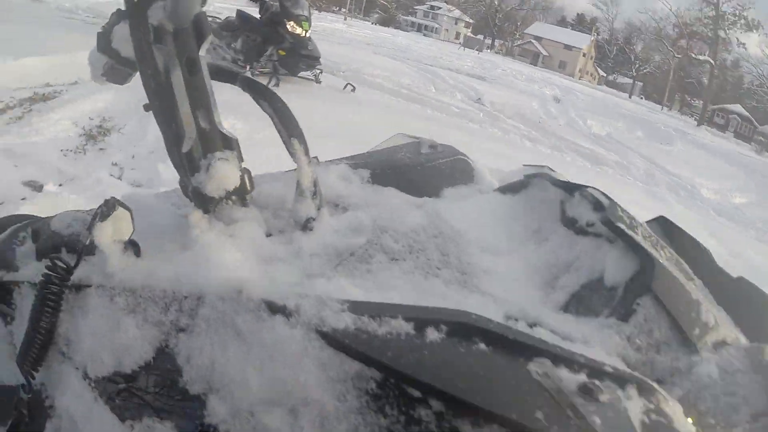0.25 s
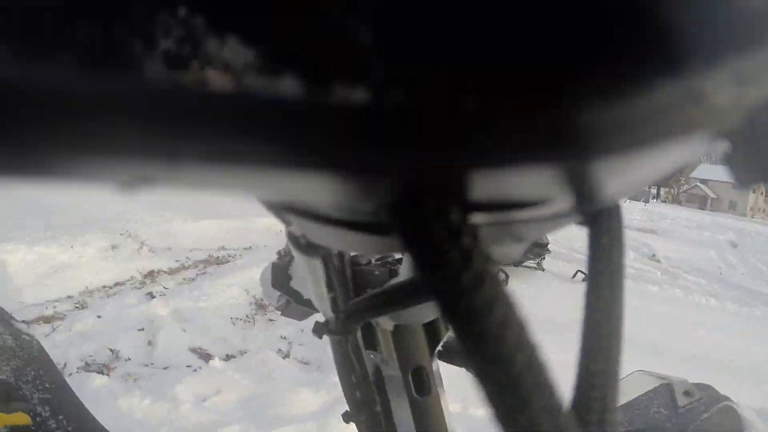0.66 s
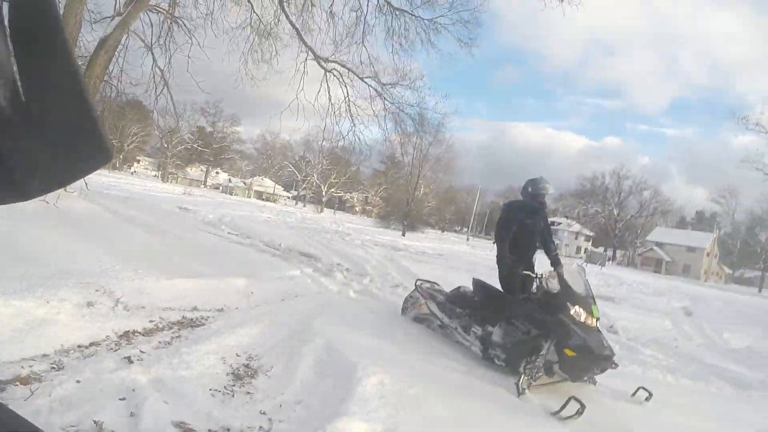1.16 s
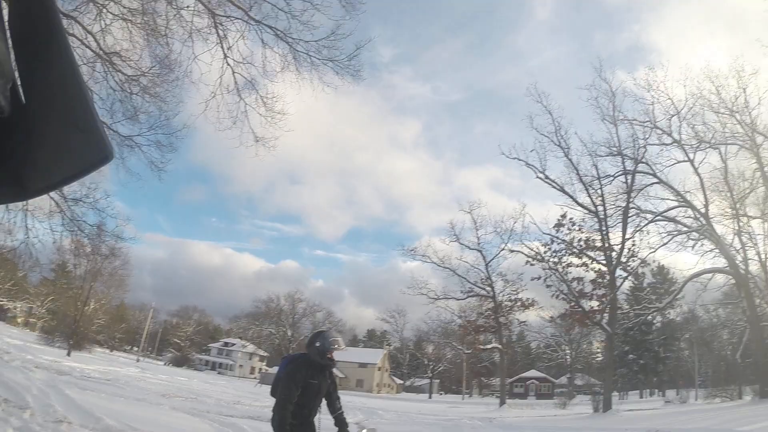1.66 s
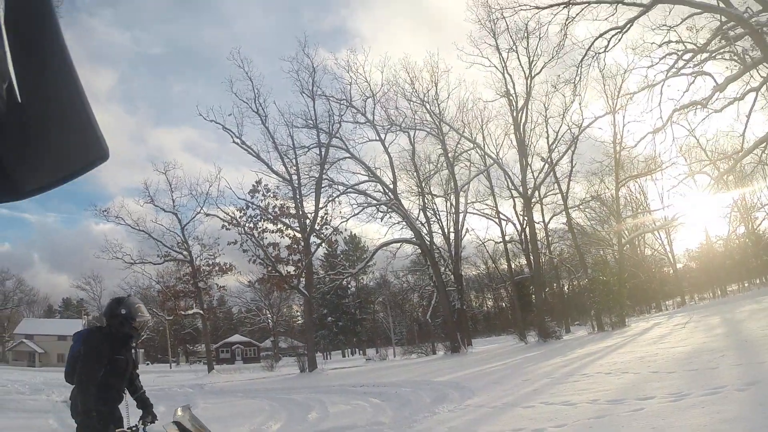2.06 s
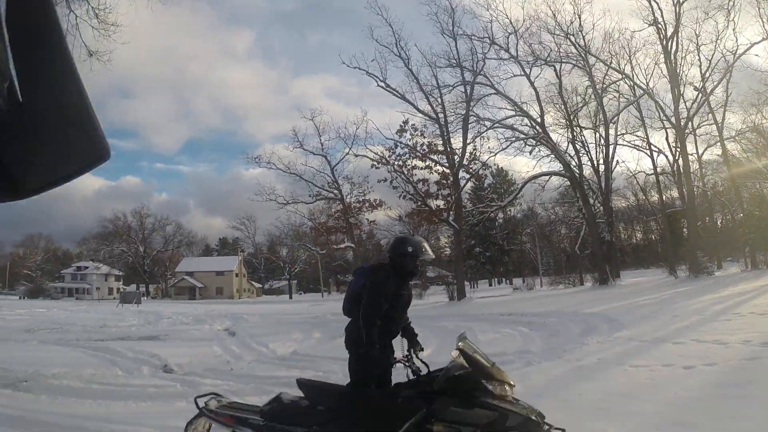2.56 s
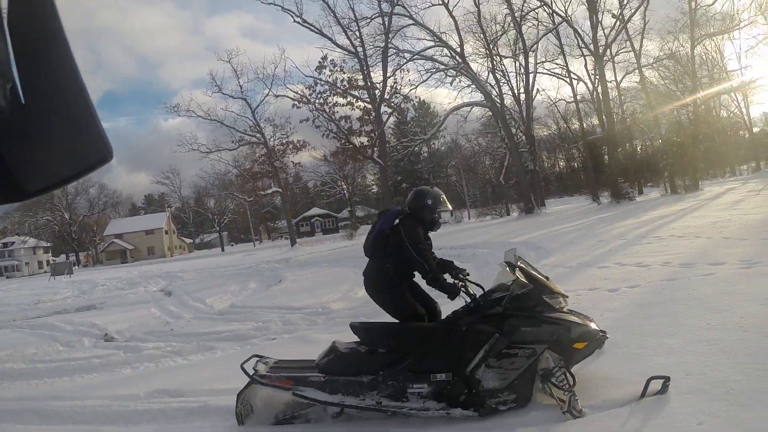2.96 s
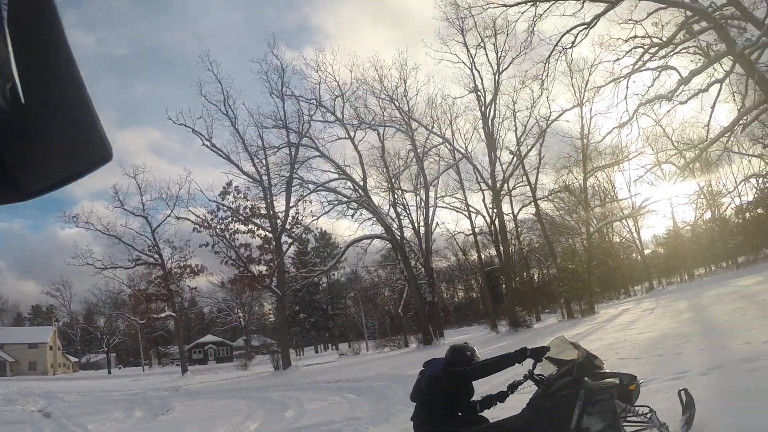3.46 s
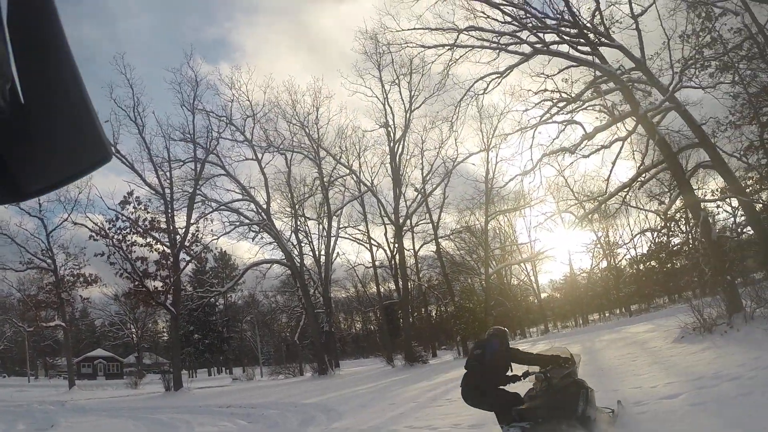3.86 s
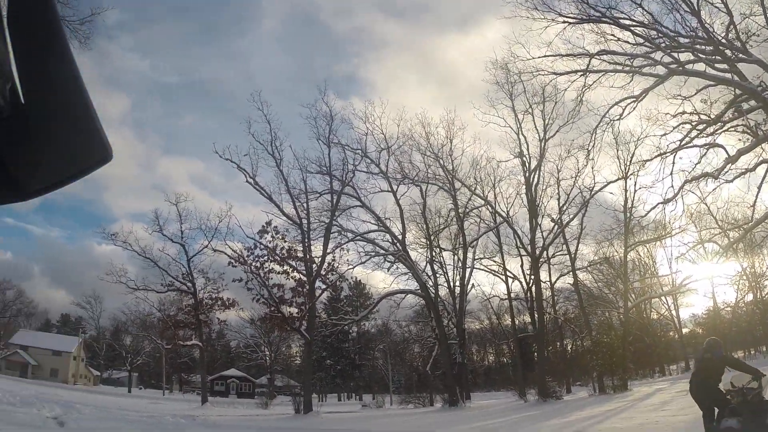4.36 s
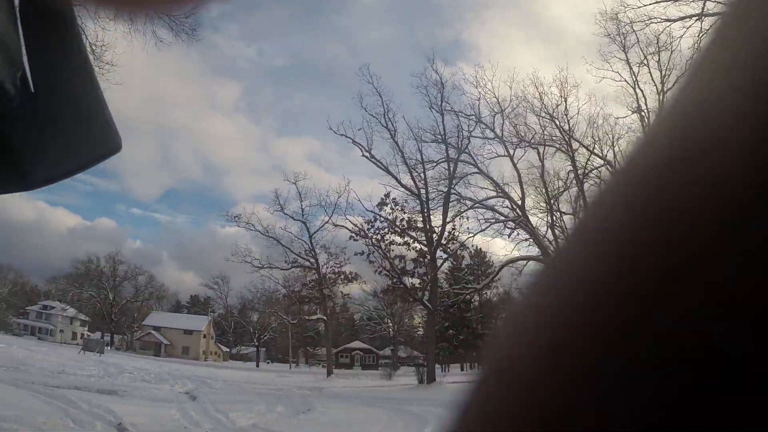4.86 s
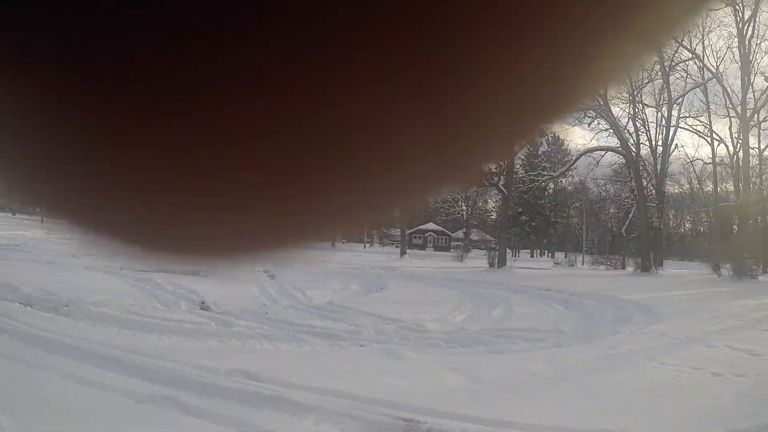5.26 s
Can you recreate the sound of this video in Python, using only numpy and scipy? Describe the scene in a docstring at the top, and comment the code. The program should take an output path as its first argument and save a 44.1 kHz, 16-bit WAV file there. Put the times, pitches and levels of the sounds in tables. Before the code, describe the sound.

A snowmobile idles while a camera mount rattles and clacks, then a second snowmobile revs past and a finger rubs the housing.

```python
"""In a snowy field, a two-stroke snowmobile idles, heard from a camera on its handlebar.
Its uneven firings make a low hum and a pulsing clatter. A gloved hand swivels the camera: the mount
rattles, clacks and scrapes. A second sled revs and drives past, its exhaust barking, its belt and chain
singing and its track slapping the snow. Then a finger lands on the housing and rubs over it."""
import sys
import numpy as np
from scipy import signal
from scipy.fft import rfft, irfft, next_fast_len
from scipy.io import wavfile
from scipy.ndimage import map_coordinates

SR = 44100
rng = np.random.default_rng(int(sys.argv[2]) if len(sys.argv) > 2 else 0)


def generate_wav(signal):
    """Clip the signal to [-1, 1] and save it as 16-bit WAV at the path in sys.argv[1]."""
    frames = np.transpose(np.atleast_2d(signal))
    scaled = np.clip(frames, -1, 1) * 32767
    pcm = np.round(scaled).astype(np.int16)
    wavfile.write(sys.argv[1], SR, pcm)


N = 242991


def amp(db):
    """Turn decibels into a gain."""
    return 10 ** (np.asarray(db) / 20)


def unit(x):
    """Scale a signal to an average (rms) level of 1."""
    return x / np.sqrt(np.mean(x ** 2) + 1e-20)


def gain(points, hz):
    """Gain at hz on a curve through (frequency [Hz], level [dB]) points."""
    f, db = np.transpose(points)
    return amp(np.interp(np.log(hz + 1), np.log(f + 1), db))


def lift(peaks, hz):
    """Gain at hz of a body that rings at (frequency [Hz], width [Hz], boost [dB]) peaks."""
    return amp(sum(db / (1 + (2 * (hz - centre) / width) ** 2) for centre, width, db in peaks))


def curves(rows):
    """One value per sample for each column after the time."""
    s, *cols = np.transpose(rows)
    return [np.interp(np.arange(N) / SR, s, c) for c in cols]


def swells(rows):
    """A gain that rises 20 dB to each peak in its rise time and drops 20 dB in its fall time."""
    t = np.arange(N) / SR
    return np.sqrt(sum(amp(db - 20 * np.maximum((s - t) / rise, (t - s) / fall)) ** 2
                       for s, db, rise, fall in rows))


def wobble(rate):
    """A smooth curve through `rate` random points a second."""
    return map_coordinates(rng.standard_normal(int(N * rate / SR) + 4), [np.arange(N) * rate / SR])


def wavering_phase(hz, jitter, rate):
    """The phase of a tone whose pitch strays at random by about the fraction `jitter`."""
    return 2 * np.pi * np.cumsum(hz * (1 + jitter * wobble(rate))) / SR


def filtered(x, response):
    """Scale each frequency in x by response(hz)."""
    m = next_fast_len(N + SR // 2)
    return irfft(rfft(x, m) * response(np.fft.rfftfreq(m, 1 / SR)), m)[:N]


def noise(colour):
    """Noise at level 1, shaped by (frequency [Hz], level [dB]) points."""
    return unit(filtered(rng.standard_normal(N), lambda hz: gain(colour, hz)))


def tap_response(response, size=4096):
    """How a body with this frequency response rings after one sharp tap."""
    cepstrum = irfft(np.log(response(np.fft.rfftfreq(size, 1 / SR)) + 1e-6))
    cepstrum[1:size // 2] *= 2  # folding it in half makes the ring start at once
    cepstrum[size // 2 + 1:] = 0
    ring = irfft(np.exp(rfft(cepstrum)))
    return ring / np.linalg.norm(ring)


def add(track, s, sound):
    """Mix a sound in at s seconds."""
    part = track[max(round(s * SR), 0):][:len(sound)]
    part += sound[:len(part)]


def friction(strokes, response, slips_per_s, hiss, spread_db):
    """Surfaces stick and slip: tiny uneven jerks and a smooth hiss ring a body during each stroke."""
    slips = (rng.random(N) < slips_per_s / SR) * rng.standard_normal(N)
    slips *= amp(spread_db * np.clip(rng.standard_normal(N), -2, 2))
    force = unit(slips) + hiss * rng.standard_normal(N)
    return swells(strokes) * unit(signal.fftconvolve(force, tap_response(response))[:N])


def idle(rough=0.12, throb_db=1.5):
    """Uneven firings give a low exhaust tone and make the engine's clatter pulse."""
    # engine speed: (time [s], firings [per s])
    speed = [(0, 38.5), (1.35, 41.5), (2.2, 41.8), (2.6, 39.5), (3.15, 42.2), (3.5, 38), (3.9, 39.8),
             (4.2, 39.6), (4.55, 39.4), (5.51, 39.7)]
    # loudness at the turning camera: (time [s], exhaust [dB], clatter [dB])
    levels = [(0, -42.5, -50), (.5, -42.5, -46.5), (1.35, -46.5, -53), (2.1, -44.5, -52.5), (3, -43.5, -50),
              (4, -48, -53), (4.6, -46.5, -52.5), (4.85, -51, -48), (5.51, -44.5, -56)]
    # exhaust tone: (multiple of the firing rate, level [dB])
    harmonics = [(1, -8), (2, 2.5), (3, -6), (4, -21), (5, -14), (6, -21), (7, -10), (8, -16), (9, -29),
                 (10, -14.5), (11, -11.5), (12, -16)]
    # clatter and dull rush under the hood: (frequency [Hz], level [dB])
    clatter = [(150, 1), (270, 2), (480, 0.5), (580, -8), (1100, -9.5), (1600, -3.5), (2150, -5),
               (2450, -9), (3400, -8.5), (4200, -16), (5100, -20.5), (5800, -20), (7500, -26.5),
               (15000, -37)]
    rate, = curves(speed)
    exhaust_db, clatter_db = curves(levels)
    phase = wavering_phase(rate, jitter=0.00867, rate=20)
    tone = sum(amp(db) * (1 + rough * wobble(21.83)) * np.cos(k * phase + rng.uniform(0, 2 * np.pi))
               for k, db in harmonics)
    throb = amp(throb_db * np.cos(phase) + 1.5 * np.cos(2 * phase) + .8 * wobble(35))
    return amp(exhaust_db) * unit(tone) + amp(clatter_db) * unit(throb * noise(clatter))


def faint_whine(hz=13906, db=-81.5):
    """A thin, steady tone beside the microphone."""
    return amp(db) * np.sqrt(2) * np.sin(2 * np.pi * hz * np.arange(N) / SR)


def swishes():
    """Short, soft swells of noise around the camera."""
    # each swish: (time [s], level [dB], half-length [s])
    puffs = [(0.072, -60, 0.025), (1.829, -41, 0.1), (4.357, -45.5, 0.059)]
    # their dull tone: (frequency [Hz], level [dB])
    colour = [(100, 12), (450, 6.5), (700, -3), (1800, -6.5), (3200, -12.5), (4700, -13), (7000, -33),
              (14000, -55)]
    t = np.arange(N) / SR
    return noise(colour) * sum(amp(db) * np.exp(-((t - s) / half) ** 2) for s, db, half in puffs)


def glove_squeak():
    """The glove takes hold, slipping with a faint squeak."""
    # the grip: (time [s], peak [dB], rise [s], fall [s])
    grips = [(.085, -52.5, .18, .07)]
    # the squeak's tone: (frequency [Hz], level [dB])
    colour = [(1500, -39.5), (3000, -15.5), (3400, 1), (3800, -12), (6000, -33)]
    return friction(grips, lambda hz: gain(colour, hz), slips_per_s=2300, hiss=.5, spread_db=3)


def mount_rattles(crunch_db=-7, crunch_fade_s=0.031, attack_s=0.001, detune=0.0071):
    """Each jolt of the mount crunches, and square hits ring the handlebar; the grip shifts its pitch."""
    # jolts: (time [s], level [dB], extra gain of the ring [dB])
    jolts = [(0.2163, -13, -1), (0.248, -21, -19), (.256, -15, -9), (0.265, -18, -12), (.285, -26, -14),
             (0.2948, -2.5, -9.5), (.302, -21, -0.5), (0.315, -11, -15.5), (0.323, -16.5, -14),
             (0.331, -21.5, -6), (0.359, -17, -3), (0.4021, -14.5, -12.5), (.425, -23.5, -3.5)]
    # the bar's notes: (frequency [Hz], level [dB], time to fade 60 dB [s])
    bar = [(501, 0.5, 0.09), (596, -6, 0.026), (863, -8.5, 0.058), (973, -6, 0.035), (1330, -12, 0.089),
           (1598, -3.5, 0.034), (1647, -11, 0.08), (2310, -9, 0.044), (2480, -7, 0.03), (2784, -14, 0.03),
           (3690, -7, 0.024), (3800, -15, 0.064), (4305, -25, 0.087), (5580, -27, 0.028),
           (5400, -14, 0.014)]
    # the crunch's tone: (frequency [Hz], level [dB])
    colour = [(120, 7), (360, -9), (520, 6), (1200, -1.5), (2400, -4), (4000, -4), (6300, -7.5),
              (7300, -27), (10000, -30), (15000, -46)]
    out, t = np.zeros(N), np.arange(SR // 5) / SR
    grit = noise(colour)
    for s, db, ring_db in jolts:
        ring = np.zeros(len(t))
        for hz, level, fade_s in bar:
            fade = amp(level + 2 * rng.normal() - 60 * t / fade_s)
            pitch = hz * (1 + detune * rng.normal())
            ring += fade * np.sin(2 * np.pi * pitch * t + rng.uniform(0, 2 * np.pi))
        crunch = amp(crunch_db - 60 * t / crunch_fade_s) * grit[round(s * SR):][:len(t)]
        add(out, s, amp(db) * (1 - np.exp(-t / attack_s)) * (amp(ring_db) * ring + crunch))
    return out


def camera_shake(attack_cycles=0.084, floor_db=-46):
    """Pushes make the camera swing on its mount; each turn adds a rumbling sway."""
    # pushes: (time [s], level [dB], frequency [Hz], time to fade 60 dB [s])
    pushes = [(0.273, -2.5, 58, 0.33), (0.294, -10, 195, 0.062), (0.351, -6, 65, 0.12),
              (.427, -9.5, 58.3, 0.49), (0.454, -26.5, 205, 0.1), (0.5526, 3, 169, 0.029),
              (0.675, -5.5, 136, 0.025), (.698, -14, 117, 0.15), (.742, -13, 174, 0.068),
              (0.81, -18.5, 180, 0.035), (0.9382, -2, 73, 0.044), (.968, -15.5, 66.9, 0.31),
              (1.819, -26, 60.6, 0.35), (2.823, -17, 60, 0.25), (4.877, 7.5, 124, 0.013),
              (4.89, 2, 29.8, 0.082), (4.906, -6.5, 73, 0.11), (5.215, -8, 31.6, 0.17),
              (5.299, -10.5, 21.2, 0.1), (5.483, -7.5, 70, 0.06)]
    # turns of the camera: (time [s], peak [dB], rise [s], fall [s])
    turns = [(.29, -15.5, 0.13, 0.68), (.75, -20, .08, 0.16), (.9, -26.5, .1, 0.43),
             (1.1, -35, 0.091, 0.092), (1.92, -33.5, 0.16, 0.46), (2.52, -30, 0.24, 0.23),
             (2.86, -29, 0.21, 0.17), (3.76, -41, 0.48, 0.33), (5.0, -21, .12, 0.057),
             (5.22, -26, 0.28, 0.18), (5.46, -27.5, 0.14, 0.16)]
    # the sway's deep tone: (frequency [Hz], level [dB])
    rumble = [(12, -6), (28, 2), (55, -12), (80, -7.5), (120, -25), (300, -33), (800, -96)]
    thumps, t = np.zeros(N), np.arange(SR // 2) / SR
    for s, db, hz, fade_s in pushes:
        onset = 1 - np.exp(-t * hz / attack_cycles)
        add(thumps, s, amp(db - 60 * t / fade_s) * np.sin(2 * np.pi * hz * t) * onset)
    sway = np.hypot(swells(turns), amp(floor_db) * hand_cover())  # the mount is never quite still
    return thumps + sway * noise(rumble)


def hand_cover(start_s=.45, end_s=1.8, close_s=0.17, open_s=.55, depth_db=-10.5):
    """The microphone's gain as the hand closes over it, stays and slides off."""
    t = np.arange(N) / SR
    covered = np.minimum((t - start_s) / close_s, (end_s - t) / open_s)
    return amp(depth_db * np.clip(covered, 0, 1))


def housing_clacks(snap=5, boost_db=5, width=0.99):
    """A snap and a short chatter ring the plastic housing, from loud, dull clacks to faint ticks."""
    # blows: (time [s], level before the boost [dB], centre [Hz], time to fade 60 dB [s])
    blows = [(0.5505, -1.5, 803, 0.01), (.634, -28, 2800, 0.035), (0.6606, -20, 2200, 0.016),
             (0.6707, -2, 943, 0.017), (.709, -41, 4970, 0.0089), (.747, -41, 2000, 0.035),
             (0.7874, -42, 1180, 0.011), (0.8087, -11.5, 810, 0.018), (0.9365, -18.5, 2460, 0.029),
             (4.8672, -11.5, 1980, 0.013), (4.877, -12, 1082, 0.03), (4.8987, -14, 1990, .02),
             (4.9838, -23, 2380, 0.048), (5.0245, -18.5, 1900, 0.018), (5.0608, -17.5, 2270, 0.0133),
             (5.0666, -17, 2400, 0.0041), (5.1737, -13.5, 3350, 0.0096), (5.2296, -34, 1960, 0.006),
             (5.436, -49, 7100, .006), (5.471, -35, 7200, 0.0068)]
    # the housing's tone: (frequency [Hz], level [dB])
    housing = [(100, 4.5), (490, 9), (750, -2.5), (1000, -8.5), (1300, -7), (1650, 4), (1950, 1), (2450, 4),
               (3300, -4.5), (6000, -11), (8000, -18.5), (12000, -30), (15000, -30.5)]
    out, t = np.zeros(N), np.arange(SR // 16) / SR
    for s, db, centre, fade_s in blows:
        force = rng.standard_normal(len(t)) * amp(-60 * t / fade_s)
        force[0] += snap
        body = tap_response(
            lambda hz: gain(housing, hz) / np.hypot(width, hz / centre - centre / (hz + 1)))
        blow = signal.fftconvolve(force, body)
        add(out, s, amp(db + boost_db) * blow / np.abs(blow).max())
    return out


def glove_brush():
    """The glove brushes lightly over the housing."""
    # strokes: (time [s], peak [dB], rise [s], fall [s])
    strokes = [(.558, -29.5, 0.0074, 0.019), (.625, -45, 0.086, 0.13), (.748, -51, 0.017, 0.055)]
    # their tone: (frequency [Hz], level [dB])
    colour = [(500, -6.5), (2000, 4), (4000, -7.5), (6500, -6), (8500, -15.5), (13000, -19), (15000, -33)]
    return friction(strokes, lambda hz: gain(colour, hz), slips_per_s=820, hiss=.6, spread_db=1)


def joint_scrape():
    """The swivel joint rasps and rings as it turns."""
    # strokes: (time [s], peak [dB], rise [s], fall [s])
    strokes = [(.66, -36.5, .07, 0.034), (.862, -26, 0.02, 0.056), (.944, -17.5, 0.074, 0.023),
               (.971, -20.5, .02, 0.0048)]
    # the rasp's tone: (frequency [Hz], level [dB])
    rasp = [(150, 4), (500, -8), (1200, -8), (2000, -3), (3200, -12.5), (5000, -22.5), (7000, -35),
            (10000, -41.5), (15000, -49.5)]
    # where the joint rings: (frequency [Hz], width [Hz], boost [dB])
    peaks = [(794, 290, 17), (1687, 110, 15), (2010, 61, 3), (2560, 520, 10.5), (3530, 120, 9.5),
             (5640, 510, 11)]
    return friction(strokes, lambda hz: gain(rasp, hz) * lift(peaks, hz),
                    slips_per_s=1800, hiss=.55, spread_db=2.5)


def sled_state(lag_s, throttle_db=22, nearest_s=3.5, nearest_m=3.2, speed_m_per_s=6):
    """The passing sled's firing rate and level in dB: louder with throttle, fainter with distance."""
    # its engine creeps up, revs and drops back: (time [s], firings [per s])
    revs = [(1.2, 102), (2, 119), (2.3, 110), (2.42, 127), (2.52, 134), (3, 141), (3.25, 149), (3.4, 177),
            (3.5, 193), (3.58, 207), (3.66, 203), (3.8, 150), (3.9, 138), (4.8, 128)]
    # its throttle: (time [s], opening [0-1])
    throttle = [(1.2, 0.1), (1.7, 0.28), (2.24, 0), (2.4, 0.49), (2.7, 0.43), (3.18, 0.33), (3.31, 0.78),
                (3.45, 0.98), (3.6, 0.89), (3.7, 0.45), (3.85, 0.33), (4.0, 0)]
    t = np.arange(N) / SR
    rate, = curves(revs)
    opening = np.interp(t - lag_s, *np.transpose(throttle))
    distance = np.hypot(nearest_m, speed_m_per_s * (t - nearest_s))
    return rate, throttle_db * (opening - 1) + 20 * np.log10(nearest_m / distance)


def passing_sled(bark_db=-35.5, buzz_db=-35.5, rush_db=-37, halfway_db=-9, rough=0.09, flutter_db=1):
    """A two-cylinder engine's harmonics slide through the peaks of its muffler, pipe and hood."""
    # the muffler shapes the low bark: (frequency [Hz], gain [dB])
    muffler = [(125, 6), (150, 0), (185, -11), (260, -14), (320, -11.5), (400, -1.5), (450, -6.5), (490, 2),
               (545, -2), (620, -18.5)]
    # the exhaust pipe shapes the higher buzz: (frequency [Hz], gain [dB])
    pipe = [(200, -12), (330, -0.5), (420, 12), (540, -3.5), (700, -6.5), (830, -8.5), (1100, -5),
            (1400, -6), (2000, -6.5), (3200, -22), (5000, -37), (7000, -31)]
    # the hood's ringing panels: (frequency [Hz], width [Hz], boost [dB])
    hood = [(1707, 160, 9.5), (1975, 60, 5), (2143, 130, 10.5), (2777, 120, 11.5), (3170, 100, 5),
            (4540, 210, 13), (5510, 410, 10.5), (5860, 750, 5)]
    # the rush of the drive train: (frequency [Hz], level [dB])
    drive = [(100, -10.5), (230, -16), (320, 0), (540, -13), (720, -12.5), (1400, -13), (2100, -9.5),
             (2500, -14), (3400, -10.5), (5000, -32), (6100, -16.5), (7200, -29.5), (10000, -34.5),
             (12500, -54.5)]
    rate, loud_db = sled_state(lag_s=0)
    _, spin_db = sled_state(lag_s=0.034)  # the drive train follows the throttle a little late
    phase = wavering_phase(rate, jitter=.002, rate=60)
    bark = sum(gain(muffler, k * rate) * np.sqrt(2) * np.sin(k * phase) for k in (1, 2, 3))
    bark *= 1 + rough * wobble(110)  # no two firings are equally strong
    whole_hz = np.arange(SR // 4)
    body = gain(pipe, whole_hz) * lift(hood, whole_hz)
    buzz = np.zeros(N)
    for k in range(7, 64):  # odd k: unequal cylinders add tones halfway between the harmonics
        strength = amp(halfway_db * (k % 2)) * body[(k * rate / 2).astype(int)]
        buzz += strength * np.cos(k * phase / 2 + rng.uniform(0, 2 * np.pi))
    fluttering = noise(drive) * amp(flutter_db * wobble(45))
    rush = unit(filtered(fluttering, lambda hz: lift(hood, hz)))
    exhaust = amp(bark_db + loud_db) * bark + amp(buzz_db + loud_db) * unit(buzz)
    return exhaust + amp(rush_db + 0.88 * spin_db) * rush


def belt_and_chain(flutter_db=3):
    """Wavering tones from the belt and chain swell, glide and fade."""
    # tones: (time [s], peak [dB], rise [s], fall [s], pitch [Hz], glide [Hz per s])
    tones = [(2.77, -51.5, .18, 0.32, 2008, 119), (3.12, -49, 0.12, .12, 1975, 300),
             (3.16, -51.5, .05, 0.17, 2190, 200), (3.4, -47.5, 0.27, 0.056, 2112, -100),
             (3.539, -42, 0.056, 0.38, 1632, 721)]
    out, t = np.zeros(N), np.arange(N) / SR
    for s, db, rise, fall, hz, glide in tones:
        phase = wavering_phase(hz + glide * (t - s), jitter=0.00644, rate=70)
        out += swells([(s, db, rise, fall)]) * unit(amp(flutter_db * wobble(50)) * np.sin(phase))
    return out


def track_beat(level_db=-41.5, slaps_per_firing=.84, step_db=-2, growth=1.4):
    """The track's ridges slap the snow in a buzz that stands out only when the engine pulls hard."""
    rate, loud_db = sled_state(lag_s=0.11)
    phase = wavering_phase(slaps_per_firing * rate, jitter=0.018, rate=50)
    buzz = sum(amp(step_db * k) * np.sin(k * phase) for k in (1, 2, 3))
    return amp(level_db + growth * loud_db) * unit(buzz)


def finger_rub():
    """Skin crackles over the housing beside the microphone."""
    # strokes: (time [s], peak [dB], rise [s], fall [s])
    strokes = [(4.872, -26.5, 0.0033, 0.015), (4.905, -25.5, 0.018, .055), (4.99, -34, .012, .15),
               (5.065, -31.5, 0.11, 0.077), (5.14, -37.5, .08, 0.064), (5.235, -41.5, 0.072, .17),
               (5.46, -42.5, .17, .07)]
    # the tone of rubbing skin: (frequency [Hz], level [dB])
    skin = [(410, -16), (700, -22), (1170, -15.5), (1380, -11), (1650, -5.5), (2370, -4.5), (2910, -4.5),
            (3390, -13), (3660, -13.5), (4980, -19.5), (6350, -20), (15000, -39.5)]
    return friction(strokes, lambda hz: gain(skin, hz), slips_per_s=1100, hiss=0.62, spread_db=0)


def scene():
    """Open snow gives no echo; the hand dims what comes through the air, but not the housing's sounds."""
    airborne = idle() + passing_sled() + belt_and_chain() + track_beat() + faint_whine()
    knocks = mount_rattles() + housing_clacks() + camera_shake()
    rubbing = glove_squeak() + glove_brush() + joint_scrape() + finger_rub()
    return (hand_cover() * airborne + knocks + rubbing + swishes())[None]


def record(dry):
    """The camera flattens the peaks of the hardest blows and keeps nothing above 15600 Hz."""
    return filtered(np.clip(dry[0], -1, 1), lambda hz: hz < 15600)[None]


dry = scene()
out = record(dry)
generate_wav(out)
```